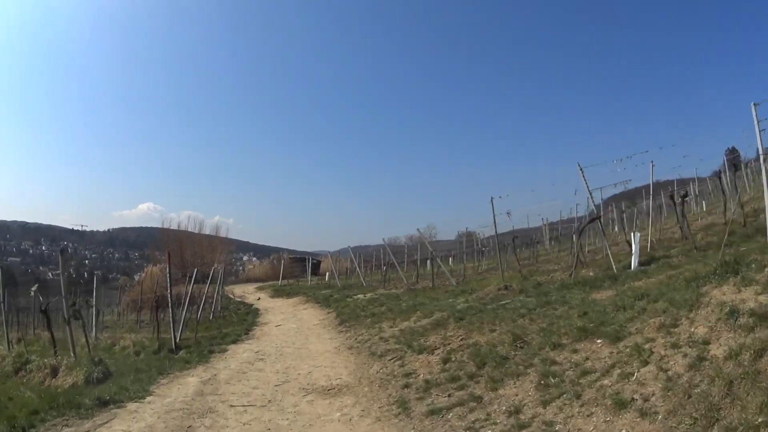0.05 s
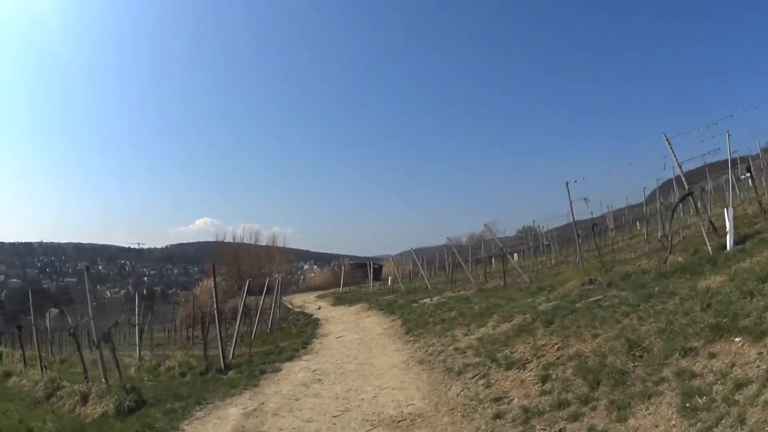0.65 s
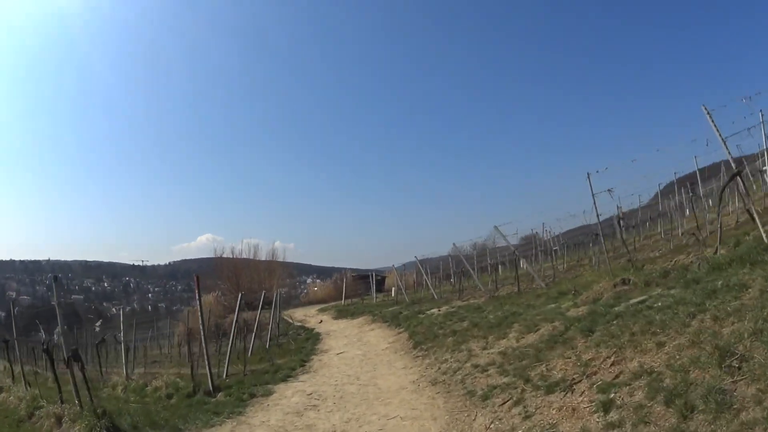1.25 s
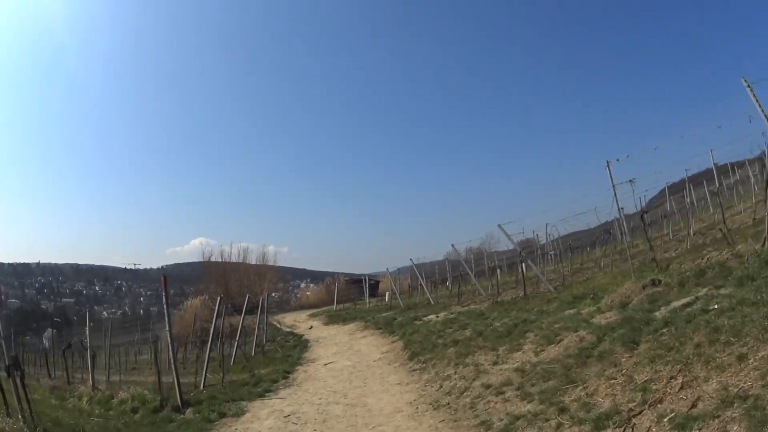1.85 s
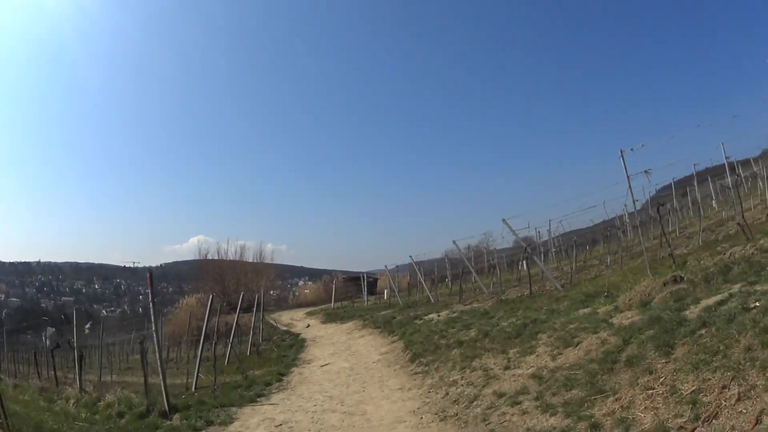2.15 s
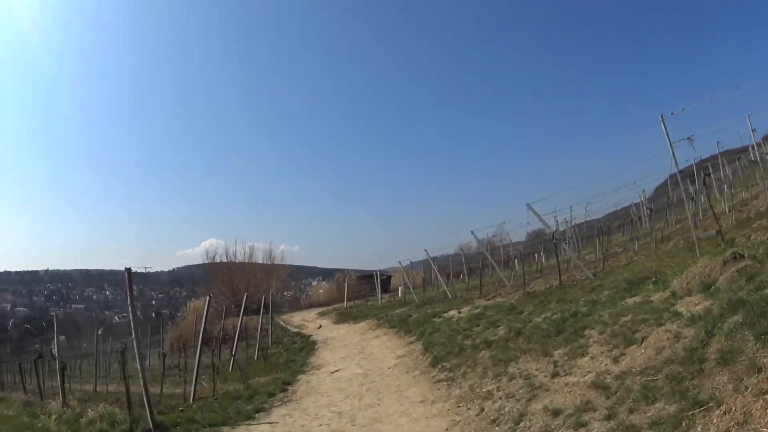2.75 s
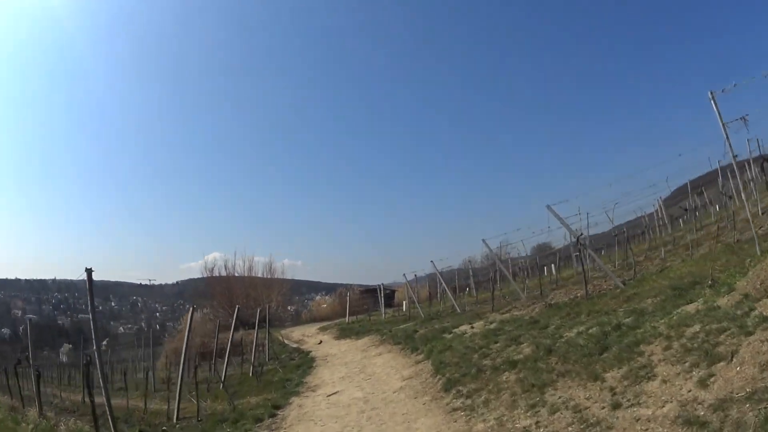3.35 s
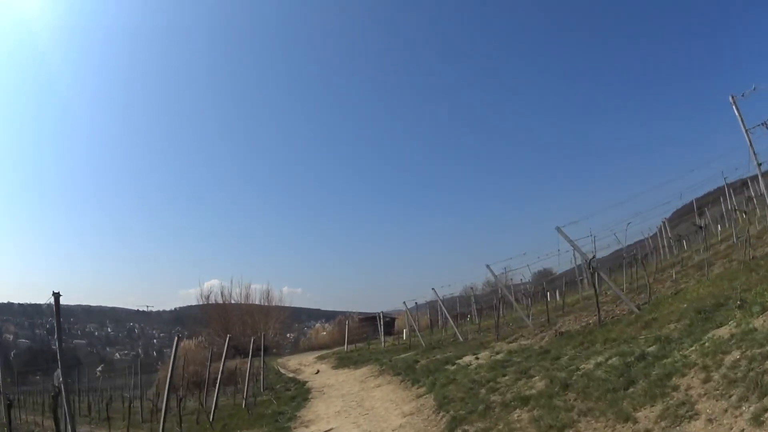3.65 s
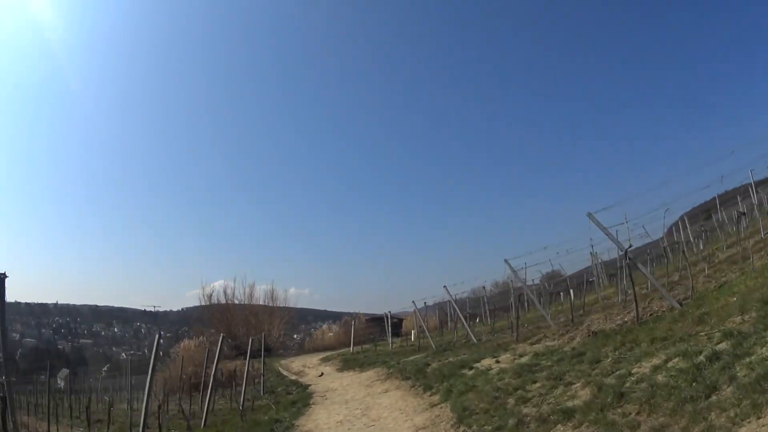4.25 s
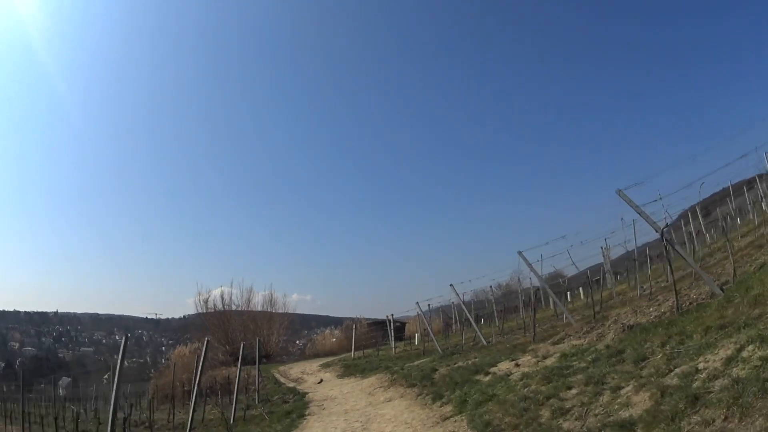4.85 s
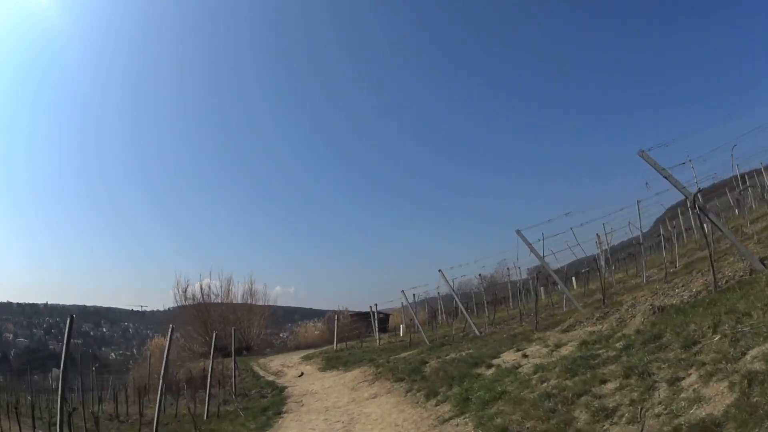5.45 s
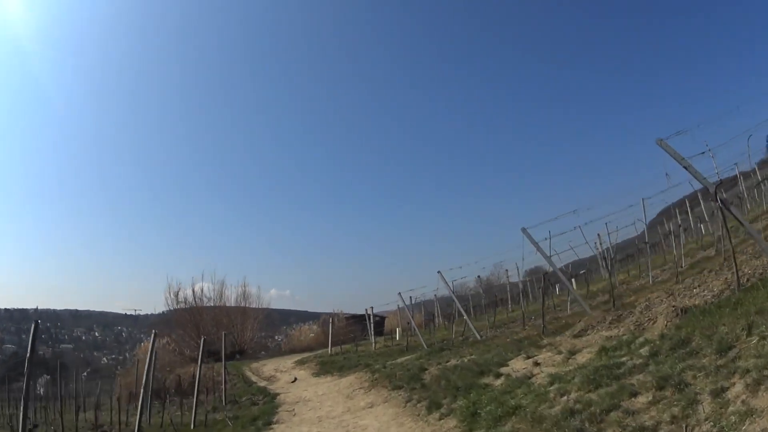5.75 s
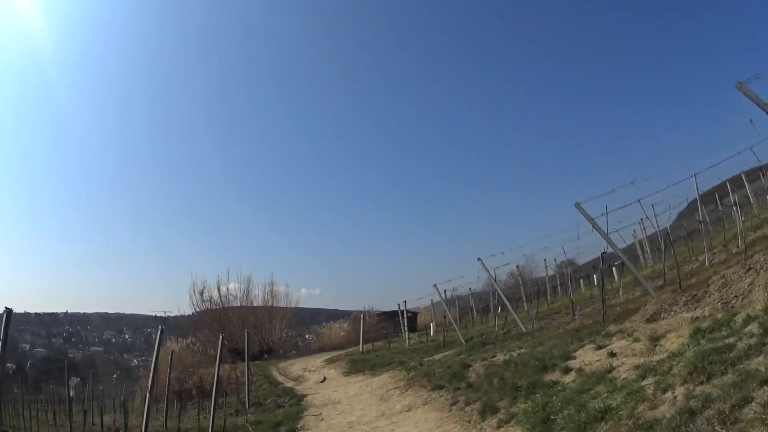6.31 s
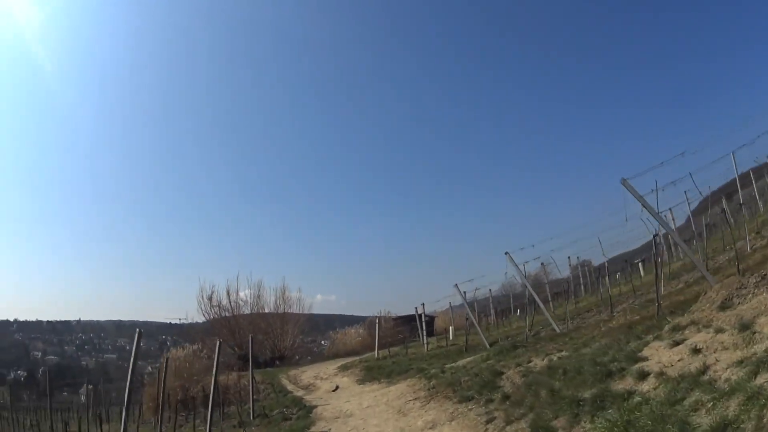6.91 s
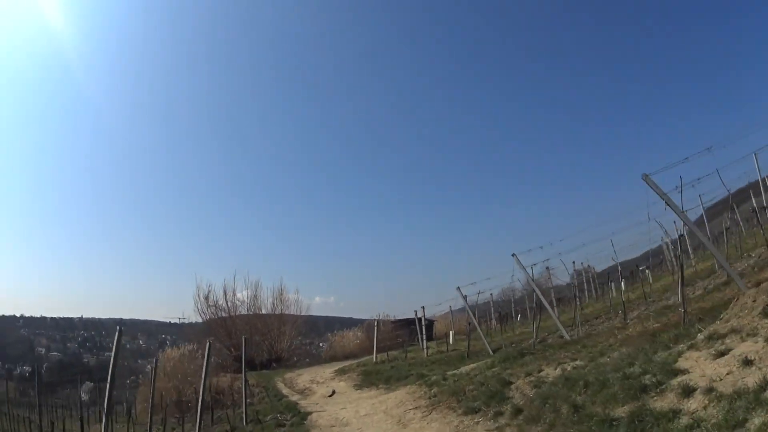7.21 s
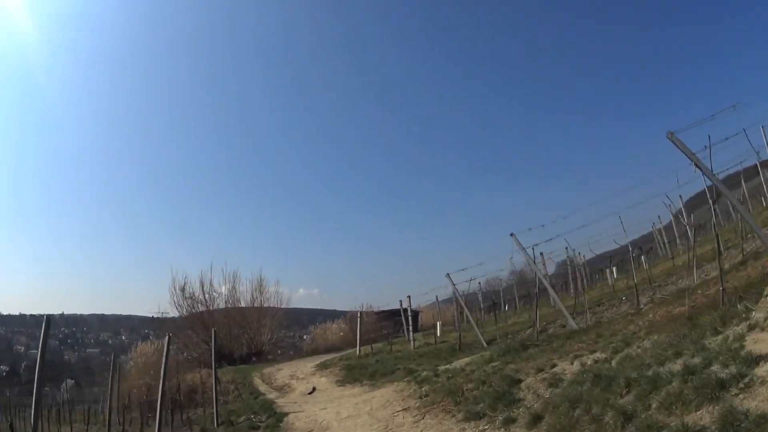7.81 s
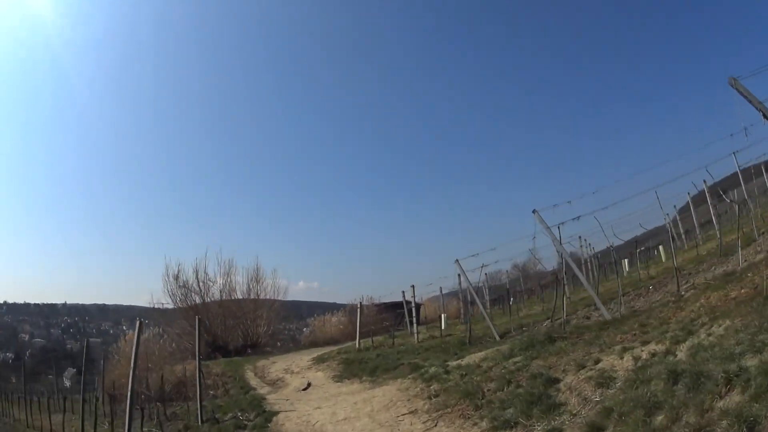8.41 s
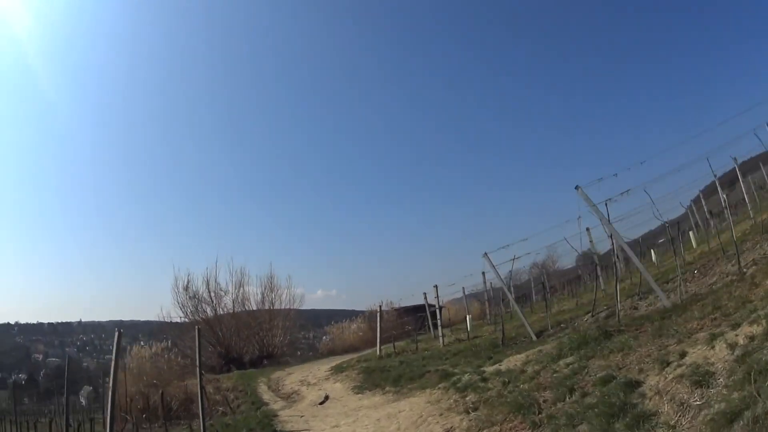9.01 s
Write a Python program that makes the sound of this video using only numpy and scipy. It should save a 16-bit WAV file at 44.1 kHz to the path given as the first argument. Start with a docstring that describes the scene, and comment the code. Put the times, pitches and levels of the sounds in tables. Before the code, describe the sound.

Someone walks at an even pace along a dry dirt track on an open hillside, carrying the microphone. Rubber heels thud softly, soles scuff over grit, and small pebbles tick underfoot. A jacket brushes faintly at the start. Wind rumbles on the microphone in gusts, strongest past the middle, over a faint wash from the valley. Near the end a shoe knocks a stone along.

```python
"""A dry dirt track on an open hillside, where someone walks at an even pace, carrying the microphone.
Rubber heels thud softly on packed earth, soles scuff over dust and press grit, and a jacket brushes.
Pebbles tick from under the shoes, and near the end a shoe knocks a stone along.
Gusts rumble on the microphone ports over the faint wash of the valley."""
import sys
import numpy as np
from scipy import signal
from scipy.fft import rfft, irfft, next_fast_len
from scipy.io import wavfile

SR = 44100
rng = np.random.default_rng(int(sys.argv[2]) if len(sys.argv) > 2 else 0)


def to_wav(s):
    """Save 16-bit WAV."""
    ch = np.atleast_2d(s).T  # columns
    pcm = np.round(np.clip(ch, -1, 1) * 32767)  # PCM
    wavfile.write(sys.argv[1], SR, pcm.astype(np.int16))


N = 404397
TIME = np.arange(N) / SR

# the walk, feet in turn: heel t/s, heel level/dB, knock f/Hz, sole delay/s, sole level/dB,
# roll level/dB, push-off delay/s, push-off level/dB
WALK = [(-.17, -38, 500, .03, -42, -60, .23, -62), (0.342, -38.5, 420, 0.086, -49, -65, 0.22, -58.5),
        (0.852, -37.5, 610, 0.04, -48, -63, 0.22, -57), (1.332, -43, 455, 0.1, -45, -57.5, .255, -56.5),
        (1.856, -37.5, 536, 0.029, -43, -60.5, 0.23, -57), (2.373, -33.5, 493, 0.02, -38, -57, .21, -59.5),
        (2.872, -37.5, 513, .02, -37.5, -61, 0.23, -58.5), (3.375, -31.5, 468, 0.11, -48, -59, 0.24, -58),
        (3.901, -34.5, 535, 0.041, -49, -62, 0.2, -58.5), (4.412, -37.5, 497, 0.044, -35, -61, 0.22, -59),
        (4.928, -37, 500, 0.028, -38, -61, 0.23, -58.5), (5.425, -41, 504, 0.096, -43, -59.5, .24, -56),
        (5.958, -33, 497, 0.092, -39, -56, 0.22, -59), (6.452, -33.5, 450, .078, -34, -55.5, .213, -57),
        (6.97, -42, 640, 0.089, -40, -56, 0.21, -58), (7.467, -33.5, 452, 0.039, -45, -58, .26, -56.5),
        (7.992, -32.5, 590, 0.096, -33, -60, 0.21, -56),
        (8.497, -34.5, 400, 0.096, -31.5, -60.5, 0.22, -58),
        (9.027, -39.5, 627, 0.033, -41, -61, 0.21, -55)]


def from_db(db):
    """Decibels to amplitude."""
    return 10 ** (np.asarray(db) / 20)


def rms_one(x):
    """Scales a signal to rms 1."""
    return x / np.sqrt(np.mean(x ** 2) + 1e-20)


def on_bins(points):
    """A curve over log frequency, read at every FFT bin."""
    hz, value = np.transpose(points)
    return np.interp(np.log(np.fft.rfftfreq(next_fast_len(N), 1 / SR) + 1), np.log(hz), value)


def filtered(x, gains):
    """An EQ with one gain for each FFT bin."""
    return irfft(rfft(x, next_fast_len(N)) * gains, next_fast_len(N))[..., :N]


def butter(x, hz, kind, order=2):
    """A causal low-, high- or band-pass."""
    return signal.sosfilt(signal.butter(order, hz, kind, fs=SR, output="sos"), x)


def drift(per_s):
    """A random wander; rms 1."""
    knots = np.arange(N) * per_s / SR
    return rms_one(np.interp(knots, np.arange(4000), rng.standard_normal(4000)))


def air_noise(spectrum):
    """Coloured stereo noise, nearly mono in the bass; rms 1."""
    # left-right likeness of the air: f/Hz, likeness/0-1
    likeness = [(50, 0.99), (120, 0.79), (260, 0.44), (600, 0.04), (1200, 0.02), (2500, 0.49), (5000, 0.18),
                (11000, 0.62)]
    alike = on_bins(likeness)
    colour = from_db(on_bins(spectrum))
    mid = filtered(rng.standard_normal(N), colour * np.sqrt(1 + alike))
    side = filtered(rng.standard_normal(N), colour * np.sqrt(1 - alike))
    return rms_one(np.array([mid + side, mid - side]))


def placed(x, pan_db, lag_ms):
    """Pans a mono sound (positive is left); it reaches the left port a little later."""
    i = np.arange(len(x))
    delayed = np.interp(i - lag_ms * SR / 1000, i, x, left=0)
    return np.array([delayed * from_db(pan_db / 2), x * from_db(-pan_db / 2)])


def add(out, s, sound):
    """Mixes in a stereo sound at s seconds, unless s is negative."""
    if s >= 0:
        part = out[:, round(s * SR):][:, :sound.shape[1]]
        part += sound[:, :part.shape[1]]


def ring(hz, t60):
    """A damped sine, 60 ms long."""
    t = TIME[:round(.06 * SR)]
    return np.sin(2 * np.pi * hz * t) * np.exp(-np.log(1000) * t / t60)


def swells(strokes, squareness=2):
    """An envelope of strokes summed in power; squareness 2 is a bell, higher is more abrupt."""
    t = TIME[::20]
    power = sum(from_db(db) ** 2 * np.exp(-np.minimum(np.abs((t - s) / half_s) ** squareness, 50))
                for s, db, half_s in strokes)
    return np.interp(TIME, t, np.sqrt(power))


def grains(per_s, spectrum, spread_db=3.0):
    """Coloured random clicks of uneven size; rms 1."""
    sizes = from_db(spread_db * np.minimum(rng.exponential(1, N), 3)) * rng.choice([-1, 1], N)
    clicks = sizes * (rng.random(N) < per_s / SR)
    return rms_one(filtered(clicks, from_db(on_bins(spectrum))))


def valley(level_db=-54.5):
    """The bed: a steady far wash of open country."""
    # colour of the wash: f/Hz, level/dB
    wash = [(15, -62), (25, 3.5), (85, -4), (156, -9.5), (391, -6), (840, -7.5), (1170, -14), (1850, -15.5),
            (2850, -24.5), (3870, -23.5), (5820, -31), (10200, -34), (11000, -38), (14300, -143),
            (22000, -120)]
    return from_db(level_db) * air_noise(wash) * from_db([[-.5], [.5]])


def wind(usual_db=-50, buffet_follows=0.86, waver_db=1.5, stride_db=1.0, stride_peak_s=0.13):
    """Big eddies rumble; smaller ones buffet the ports in lumps, hardest in the gusts."""
    # strength of the breeze: t/s, level/dB
    breeze = [(0, -60.5), (.75, -58), (1.2, -60), (1.5, -58), (2.4, -54.5), (2.9, -57), (3.4, -58.5),
              (3.9, -51.5), (4.15, -47), (4.7, -46.5), (5.3, -51), (5.85, -44), (6.3, -56.5), (6.9, -49),
              (7.12, -42), (7.7, -53), (8.4, -54), (9.17, -55)]
    # brief gusts: centre t/s, rumble level/dB, buffet level/dB, half length/s
    gusts = [(0.88, -40, -40, 0.028), (1.68, -41, -50.5, 0.033), (2.434, -55, -49, 0.054),
             (2.584, -40, -37.5, 0.024), (2.793, -53, -49.5, 0.024), (4.047, -40, -43, 0.027),
             (4.557, -43, -59, 0.034), (4.662, -42, -37, 0.022), (5.053, -39.5, -39, 0.033),
             (5.877, -38, -45.5, .035), (6.002, -47, -39.5, 0.013), (6.65, -42, -40, 0.075),
             (7.485, -43.5, -42.5, 0.043), (8.06, -49, -49, 0.049)]
    # deep rumble, steady buffeting and gusts with fuller low mids: f/Hz, level/dB
    rumble_colour = [(12, -15), (25, -6), (40, -3), (65, .5), (105, 0), (135, -2), (190, -12), (320, -28),
                     (1500, -80)]
    buffet_colour = [(60, -23.5), (125, -1.5), (170, 3.5), (260, 0), (380, -12.5), (620, -26.5),
                     (1200, -33), (4000, -77)]
    gust_colour = [(60, -14), (125, -1.5), (180, 3.5), (270, 1.5), (380, -5.5), (620, -17.5), (1200, -50),
                   (4000, -80)]
    # the air past the ports quickens just after each heel lands
    stride = np.interp(TIME - stride_peak_s, [s for s, *_ in WALK], np.arange(len(WALK)))
    breeze_db = np.interp(TIME, *np.transpose(breeze)) + stride_db * np.cos(2 * np.pi * stride)
    buffet_db = usual_db + buffet_follows * (breeze_db - usual_db) - 2
    s, gust_rumble_db, gust_buffet_db, half_s = np.transpose(gusts)
    breeze_swell = from_db(breeze_db + 2 + waver_db * drift(per_s=16))
    rumble_swell = np.hypot(breeze_swell, swells(zip(s, gust_rumble_db, half_s)))
    buffet = from_db(buffet_db + waver_db * drift(per_s=16)) * air_noise(buffet_colour)
    puffs = swells(zip(s, gust_buffet_db, half_s)) * air_noise(gust_colour)
    lumps = rms_one(from_db(2.0 * drift(per_s=60)))
    return rumble_swell * air_noise(rumble_colour) + (buffet + puffs) * lumps


def jacket():
    """Cloth brushes in a few short, airy swishes."""
    # swishes: centre t/s, level/dB, half length/s
    swishes = [(.055, -64.5, 0.064), (.84, -63, 0.0084), (1.04, -56, 0.011), (1.145, -59, 0.013),
               (1.595, -61, 0.01), (1.642, -58, 0.0066), (1.81, -60, 0.008)]
    # colour of the cloth: f/Hz, level/dB
    cloth = [(500, -26), (2000, -9), (4000, -1), (6200, -7), (8000, -14.5), (11000, -26.5)]
    return swells(swishes) * air_noise(cloth)


def friction(strokes, spectrum, rub_db, grit_db, catch_db):
    """The sliding sole rubs fine dust and rolls coarser grains, catching and slipping as it goes."""
    grit = placed(grains(1100, spectrum), pan_db=-1.5, lag_ms=0.025)
    rub = air_noise(spectrum) * from_db([[-1.7], [1.7]])
    pressure = swells(strokes, squareness=2.8) * from_db(catch_db * drift(per_s=160))
    return pressure * (from_db(rub_db) * rub + from_db(grit_db) * grit)


def scuffs():
    """Every step skims the ground, rolls off the heel, bears the weight and pushes off."""
    # an uneven gait, one row a foot:
    # skim level/dB, roll delay/s, roll half length/s, push-off half length/s
    feet = [(-77, 0.044, 0.027, .05), (-60.5, 0.076, .036, 0.032)]
    # the light toe brushes brightly, the loaded heel grinds dully: f/Hz, level/dB
    brush = [(80, -41), (450, 3.5), (850, 1.5), (1150, -2.5), (1900, -2), (2900, -8.5), (4200, -9),
             (5200, -20), (6500, -26.5), (11000, -32)]
    grind = [(80, -30), (250, -4.5), (450, 5.5), (850, 3.5), (1150, 0.5), (1900, -3), (2800, -13),
             (4100, -11), (5200, -24), (11000, -47)]
    light, heavy = [], []   # strokes: centre t/s, level/dB, half length/s
    for k, (s, *_, roll_db, push_s, push_db) in enumerate(WALK):
        skim_db, roll_s, roll_half_s, push_half_s = feet[k % 2]
        light.append((s - .049, skim_db, .022))   # the swinging heel grazes just before it lands
        heavy.append((s + roll_s, roll_db, roll_half_s))
        heavy.append((s + .12, -66, .2))   # faint grinding while the foot carries the weight
        light.append((s + push_s, push_db, push_half_s))
    return (friction(light, brush, rub_db=-0.5, grit_db=2.0, catch_db=1.5)
            + friction(heavy, grind, rub_db=0.5, grit_db=3.0, catch_db=2.0))


def contacts(sole_pitch_ratio=0.793, toe_lead_s=0.01026):
    """Heel, sole and toe land, with extra knocks on some steps: t/s, level/dB, f/Hz, thump/0-1."""
    # louder dull toe and sole knocks, and a few stray ones, on packed earth: t/s, level/dB, f/Hz
    extra_knocks = [(.643, -43, 557), (.8065, -42, 700), (1.771, -43, 664), (2.562, -34.5, 480),
                    (2.582, -33, 385), (2.92, -34, 730), (2.967, -37.5, 430), (3.067, -37, 420),
                    (3.765, -40.5, 360), (4.654, -32, 368), (6.631, -32, 483), (6.696, -34, 380)]
    for s, heel_db, hz, sole_s, sole_db, _, push_s, _ in WALK:
        yield s, heel_db, hz, 0.67
        yield s + sole_s, sole_db, hz * sole_pitch_ratio, 0.39   # the flat sole knocks lower
        yield s + push_s - toe_lead_s, -46, 400, 0.39   # the toe bumps as the push-off peaks
    for s, db, hz in extra_knocks:
        yield s, db, hz, 0.56


def crunch(gain_db=-60, settle_s=0.009, floor=0.35):
    """Crumbs of earth break one by one, loudest under the weight that follows each contact."""
    # colour of dry dirt: f/Hz, level/dB
    dirt = [(80, -48), (450, 4), (800, 3.5), (1150, -0.5), (1900, -4.5), (2500, -6), (3000, -13),
            (4100, -13), (5200, -21), (6500, -25.5), (11000, -34)]
    weight = sum((TIME > s) * np.exp(-np.clip((TIME - s) / settle_s, 0, 30)) for s, *_ in contacts())
    crumbs = grains(32, dirt) * (np.minimum(weight, 1) + floor)
    return from_db(gain_db) * placed(crumbs, pan_db=-7.0, lag_ms=0.094)


def footfalls(thump_hz=165, thump_t60=0.029, soft_hz=1300, gain_db=2.5, edge_db=-16):
    """Rubber on packed earth: a short knock with a faint sandy rasp, over a lower thump."""
    out = np.zeros((2, N))
    for s, db, hz, thump_share in contacts():
        detune, damping = rng.standard_normal(2)
        thump = butter(ring(thump_hz * np.exp(0.425 * detune), thump_t60), soft_hz, "low")
        knock = butter(ring(hz, t60=.015 * np.exp(.25 * damping)), soft_hz, "low")
        sand = rms_one(butter(rng.standard_normal(len(knock)), [550, 1700], "band"))
        sand *= np.exp(-TIME[:len(knock)] / .006)
        blow = knock / np.abs(knock).max() + 0.71 * thump_share * thump + from_db(edge_db) * sand
        add(out, s, -from_db(db + gain_db) * placed(blow, pan_db=-0.5, lag_ms=0.26))
    return out


def stones(gain_db=1.5, snap_db=-9, skitter_db=7, grating_s=0.0032, thud_db=-9):
    """A stone cracks, grates briefly and thuds on the earth; small pebbles skitter and snap brightly."""
    # pebbles from under the sole and kicked stones: t/s, level/dB, f/Hz, pan/dB, grating level/dB
    strikes = [(0.4267, -42.5, 1290, -1, -10), (0.8954, -40, 2230, -4, -12), (1.2116, -35.5, 2930, 3, -9),
               (1.267, -34, 1900, -5, -10), (1.2712, -30.5, 930, 1, -3), (1.2825, -34, 1600, -2.6, -8),
               (1.9735, -27.5, 3870, 2, -20.5), (2.3973, -39, 1480, -1.7, -12),
               (2.4092, -31.5, 1420, -2, -9), (2.9017, -44, 3050, -1.6, -13),
               (3.2755, -43.5, 1550, -2, -12), (3.4537, -42, 1410, -5, -10), (3.938, -41.5, 1170, -3, -12),
               (4.027, -32, 3700, 1, -17), (4.4696, -39, 1150, -4, -16), (5.235, -30, 3970, 4, -18),
               (6.9694, -29, 1400, -2, -26), (7.2112, -29.5, 3220, -33, -34), (7.4873, -39.5, 1200, -3, -9),
               (8.5474, -33, 1850, -2, -22), (8.9022, -24.5, 1910, 4, -12),
               (8.9085, -13.5, 2100, -2, -26.5), (8.9657, -30, 1070, -2, -14.5),
               (8.9691, -32, 2400, -5, -26), (8.9738, -34, 1490, -1, -22), (9.0589, -38.5, 1640, -2, -10)]
    # colour of a stony contact: f/Hz, level/dB
    stone_colour = [(200, 6.5), (800, 3.5), (1150, -4), (1900, 1.5), (2600, -2), (3600, -1.5), (4600, 1),
                    (5600, -21), (8000, -16), (11000, -24)]
    knocks, snaps = np.zeros((2, 2, N))
    t = TIME[:round(.03 * SR)]
    impulse = 1.0 * (np.arange(len(t)) == 2)
    thud = placed(ring(hz=380, t60=0.018), pan_db=0.5, lag_ms=0.58)
    for s, db, hz, pan_db, grating_db in strikes:
        smallness = min(hz / 3400, 1) ** 6
        rasp = rng.standard_normal((3, len(t))) * (rng.random(len(t)) < .4) * np.exp(-t / grating_s)
        grating = placed(rasp[0], pan_db, lag_ms=0.065) + .5 * rasp[1:]   # a point plus stereo spread
        crack = placed(impulse, pan_db, lag_ms=0.018)
        contact = crack + from_db(grating_db + skitter_db * smallness) * grating
        hit = butter(contact, hz * 1.43, "low", order=4)
        hit = butter(hit, hz / 1.76, "high", order=1)
        gain = -from_db(db + gain_db) / np.abs(hit.mean(axis=0)).max()
        add(knocks, s, gain * hit)
        add(snaps, s, gain * contact * smallness)
        add(knocks, s, from_db(db + thud_db) * (1 - smallness) * thud)
    bright = from_db(snap_db) * butter(snaps, [3800, 6200], "band", order=1)
    return filtered(knocks, from_db(on_bins(stone_colour))) + bright


def scene():
    """The walker up close, over the wind and the valley."""
    return jacket() + footfalls() + scuffs() + crunch() + stones() + wind() + valley()


def record(dry):
    """A steep low-pass cuts the top above 11.2 kHz."""
    return signal.sosfilt(signal.ellip(10, .1, 70, 11200, fs=SR, output="sos"), dry)


dry = scene()
out = record(dry)
to_wav(out)
```